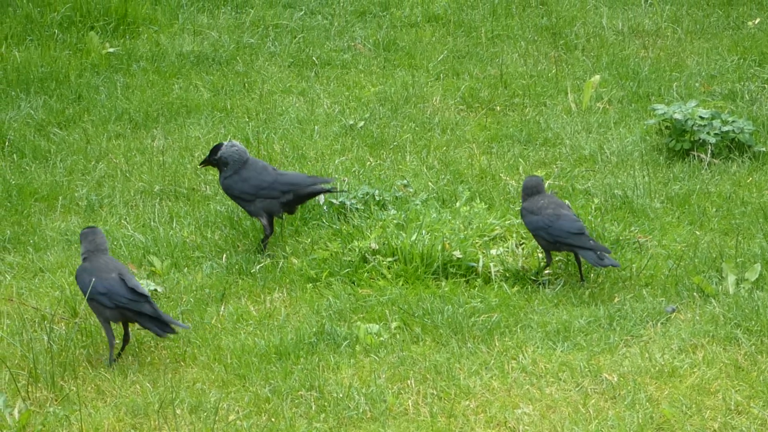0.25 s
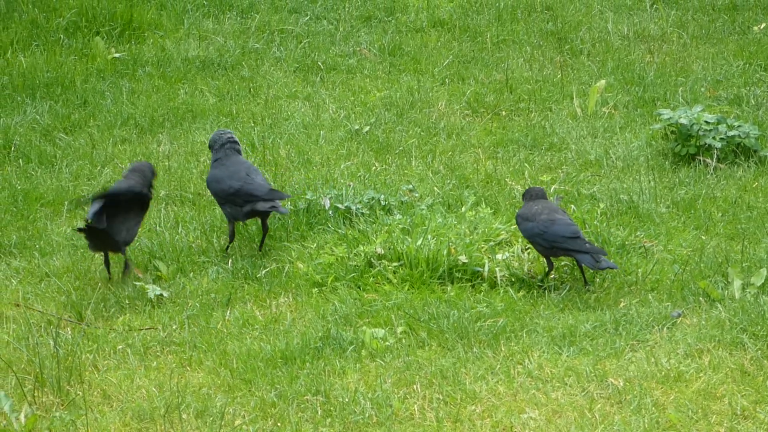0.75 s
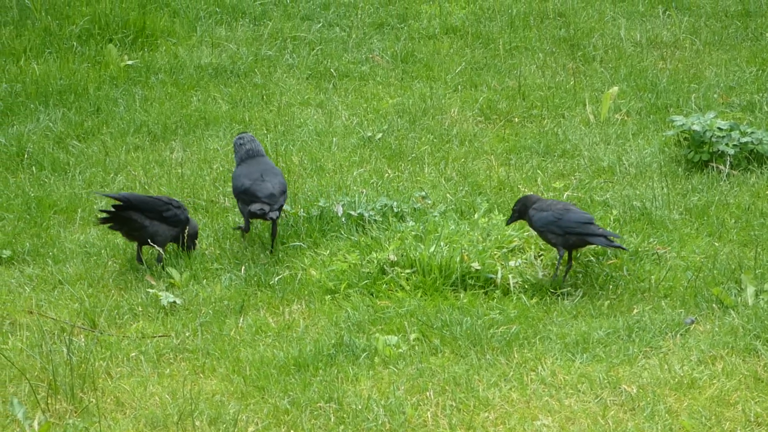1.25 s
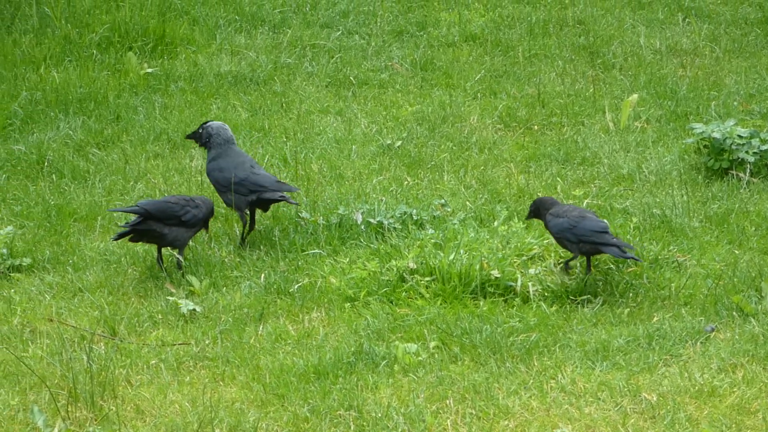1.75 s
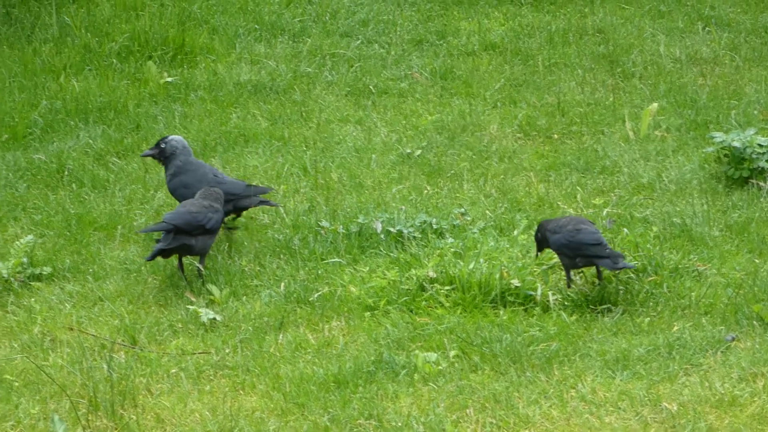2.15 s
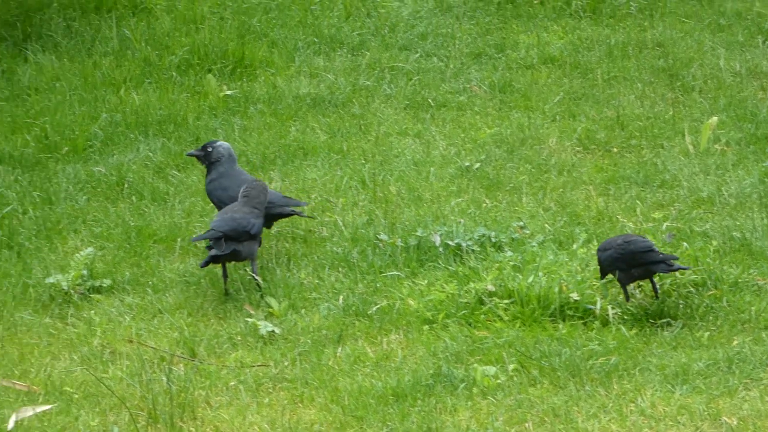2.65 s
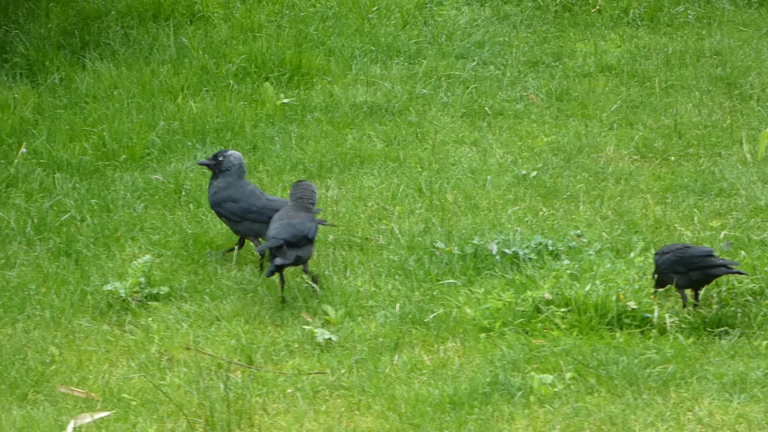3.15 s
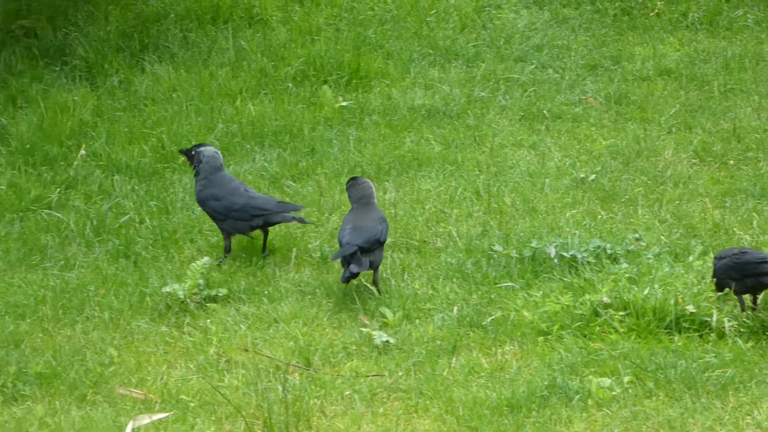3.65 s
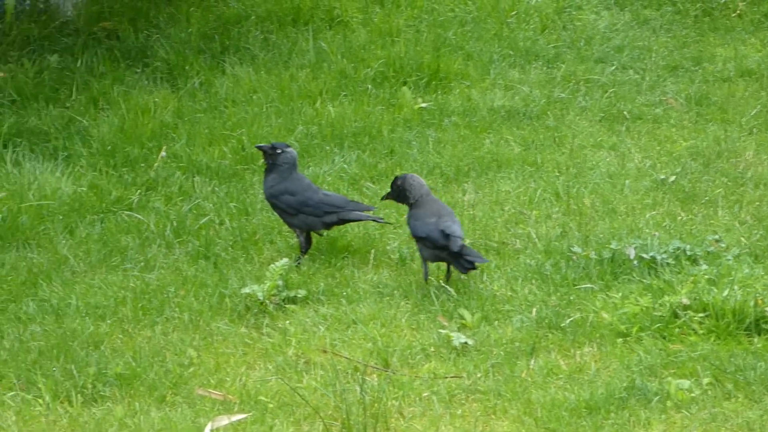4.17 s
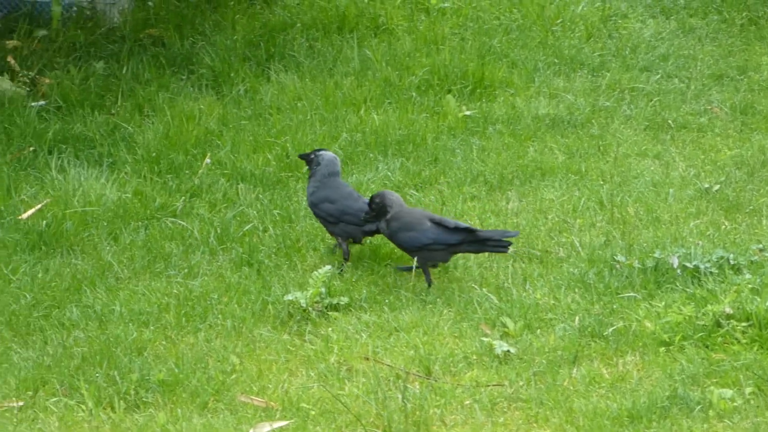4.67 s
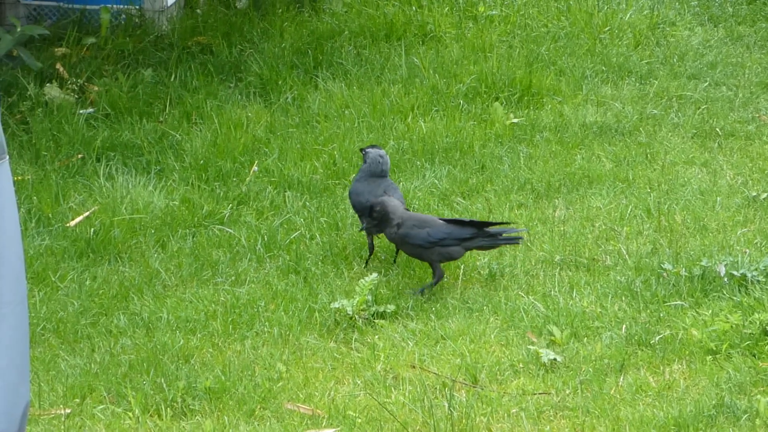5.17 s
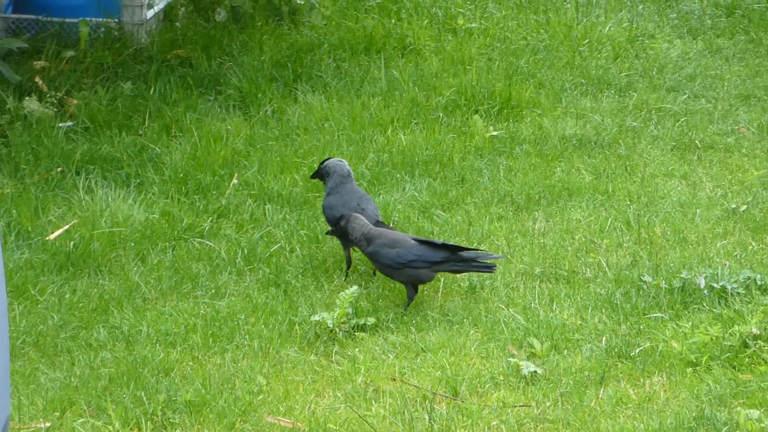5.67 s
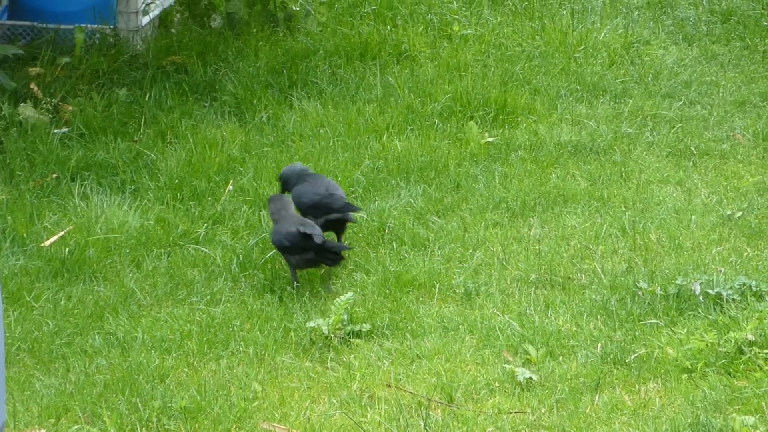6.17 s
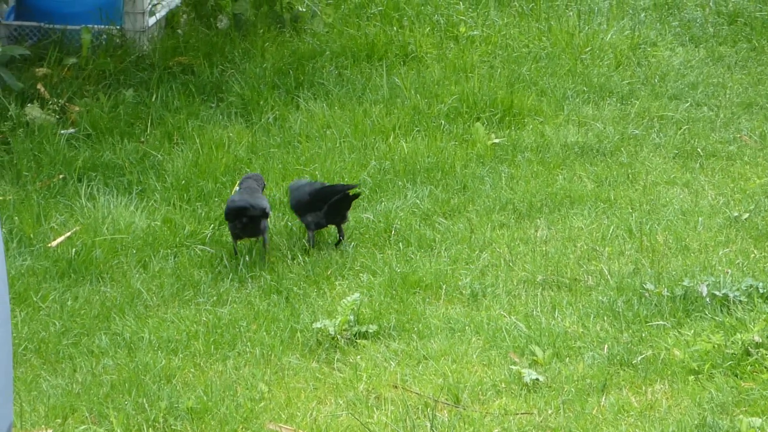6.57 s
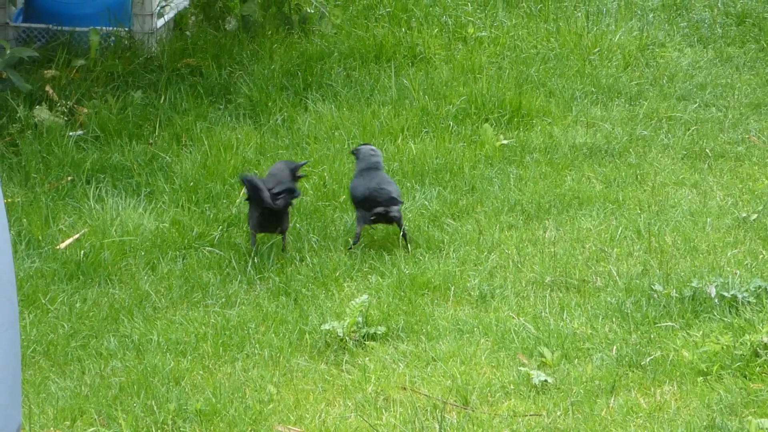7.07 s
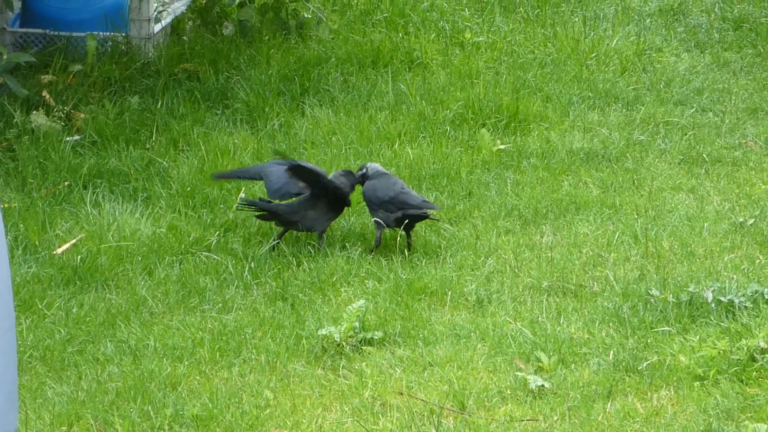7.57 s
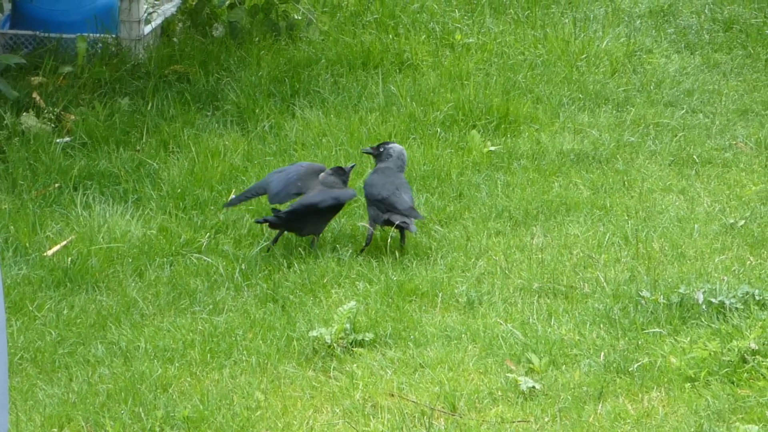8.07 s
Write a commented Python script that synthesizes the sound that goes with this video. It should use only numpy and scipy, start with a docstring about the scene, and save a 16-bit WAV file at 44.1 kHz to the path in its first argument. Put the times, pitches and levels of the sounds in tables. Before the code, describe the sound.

Jackdaws chatter rapidly with harsh chaks, squeaks and nasal caws in a garden, ending with two louder falling begging calls.

```python
"""Jackdaws on a lawn between echoing house walls, over a soft outdoor hush. First come a spit of hiss
from a bill and low mutters. From 0.6 s one bird runs four times through a phrase of whistles, chaks,
tsiks, squeaks, wheeps and rasps, with nasal caws in between; a dull knock falls at 5.5 s. Just after 7 s
come two loud, falling begging calls, then a last mutter. Each call is a vibrating membrane in the
bird's voice box, mixed with breath and shaped by the throat and bill."""
import sys
import numpy as np
from scipy import signal
from scipy.fft import rfft, irfft
from scipy.io import wavfile

SR = 44100
rng = np.random.default_rng(int(sys.argv[2]) if len(sys.argv) > 2 else 0)


def generate_wav(signal):
    """Clip the signal to [-1, 1] and save it as 16-bit WAV at the path in sys.argv[1]."""
    frames = np.transpose(np.atleast_2d(signal))
    scaled = np.clip(frames, -1, 1) * 32767
    pcm = np.round(scaled).astype(np.int16)
    wavfile.write(sys.argv[1], SR, pcm)


N = 367353
CUTOFF_HZ = 15750

# Begging calls: t/s, length/s, level/dB, attack/s, release/s, droop/(dB/s), f/Hz, sag/(Hz/s),
# lowest f/Hz, starting roughness/0-1, crack t/s, crack drop/Hz, tumble t/s, tumble drop/Hz
BEG_CALLS = [(7.165, 0.25, -23, 0.037, .075, 59, 1428, 2757, 526.4, 0.03, .037, 204.7, .082, 225.4),
             (7.558, 0.18, -28, 0.049, 0.072, 20, 1432, 3400, 444, 0.76, 0.032, 110.8, .072, 270.2)]
# Tone colour the throat gives them: f/Hz, level/dB
BEG_COLOUR = [(500, -37), (1050, -13), (1450, -7.5), (2050, 1), (2800, 0), (3400, -11), (4100, -21.5),
              (4700, -4), (5200, -12.5), (6200, -3), (7400, -22), (8600, -13), (11000, -24), (15000, -40)]


def begging():
    """Two loud calls that fall by more than an octave while the bill opens."""
    out = np.zeros(N)
    for s, *call in BEG_CALLS:
        shape, gape = beg_shape(*call)
        add(out, s, syrinx(shape, BEG_COLOUR, jitter=.06, breathiness=.6, gape=gape, fray=.17))
    return out


def beg_shape(length_s, top_db, attack_s, release_s, droop_db_per_s, start_hz, sag_hz_per_s, lowest_hz,
              onset_rough, crack_s, crack_hz, tumble_s, tumble_hz):
    """The pitch sags, cracks suddenly, then tumbles softly; the voice falters at both drops."""
    t = np.arange(round(length_s * SR)) / SR
    tumble_width_s, recover_s = .0112, .0072
    cracked, tumbled = step(t, crack_s, width_s=.00063), step(t, tumble_s, tumble_width_s)
    pitch = np.maximum(start_hz - sag_hz_per_s * t - crack_hz * cracked - tumble_hz * tumbled, lowest_hz)
    pitch *= 1 + .013 * cracked * flutter(rate_hz=120, size=len(t))   # a quaver after the crack
    level_db = top_db + envelope(t, attack_s, release_s, fade_db=11.5, onset_db=31.5)
    level_db -= droop_db_per_s * t
    level_db -= 19 * cracked * np.exp(-np.abs(t - crack_s) / recover_s)
    level_db -= 5 * bump(t, tumble_s, tumble_width_s)
    late_rough = np.interp(pitch, [lowest_hz, start_hz], [.4, .18])   # lower is rougher
    roughness = (1 - cracked) * onset_rough + cracked * late_rough
    focus = (1 - cracked) * 1.55 + cracked * np.interp(t, [crack_s, length_s], [1.39, .75])
    early = t < tumble_s + tumble_width_s   # the open bill boosts harmonic 2, then harmonic 4
    gape_hz, boost_db = np.where(early, 2, 4) * pitch, np.where(early, 4.5, 7.5)
    return np.column_stack([t, pitch, level_db, roughness, focus]), np.column_stack([t, gape_hz, boost_db])


# Chaks sung: t/s, level/dB, length factor, pitch factor
CHAK_NOTES = [(.738, -39, 1.12, 0.99), (1.336, -38.5, 1.2, 1.013), (2.232, -37.5, 1.13, 1.02),
              (2.846, -37, 1.07, 1.01), (4.069, -37.5, 1.07, 1.003), (4.679, -36.5, 1.01, 1.005),
              (6.080, -37.5, 1.11, 0.99), (6.692, -37, 1.1, 1.027)]
# Throat colour: f/Hz, level/dB
CHAK_COLOUR = [(500, -10.5), (750, -21.5), (1400, -6.5), (1900, -11), (2800, -2.5), (3400, -0.5),
               (3880, 2.5), (4450, -8.5), (6000, -14), (7500, -24.5), (10000, -27.5), (15000, -68)]
# Moving boost from the open bill: t/s, f/Hz, level/dB
CHAK_BILL = [(0, 3900, 8.1), (.035, 3860, 1.3), (.05, 1570, 0.93), (.08, 750, 7), (.11, 720, 18.7)]


def chaks():
    """Hard, hoarse calls that break to a lower pitch."""
    shape = syllable(length_s=.11, start_hz=1288.4, end_hz=702.5, sag_hz_per_s=898, break_s=.033,
                     slide_s=.017, attack_s=.0098, release_s=.1, fade_db=12.5, top_db=.5, dip_db=2.5,
                     rough=(.46, .85, .37), focus=(2.04, 1.03))
    return sing(CHAK_NOTES, shape, CHAK_COLOUR, jitter=.065, breathiness=.62, gape=CHAK_BILL)


# Tsiks sung: t/s, level/dB, length factor, pitch factor
TSIK_NOTES = [(1.061, -43, 1.16, 0.94), (2.561, -41.5, 1.07, 0.95), (4.393, -41.5, 1.05, 1.001),
              (6.413, -41.5, 1.12, 0.94)]
# Throat colour: f/Hz, level/dB
TSIK_COLOUR = [(600, -22), (1300, 8), (2200, -3.5), (3000, -1), (3700, 15.5), (4700, -4.5), (6000, -1),
               (6700, 11.5), (7450, -15.5), (8050, -37), (9800, -2), (15000, -45)]
# Boost from the open bill: t/s, f/Hz, level/dB
TSIK_BILL = [(0, 6740, 3.7), (.01, 6900, 9.4), (.02, 3750, 8), (.032, 3700, 6), (.05, 1210, 2.8)]


def tsiks():
    """Sharp, breathy calls that dive two octaves."""
    shape = syllable(length_s=.09, start_hz=3435, end_hz=793, break_s=.015, slide_s=.017, attack_s=.0014,
                     release_s=.094, fade_db=14.5, top_db=3, rough=(.75, .923, .85), focus=(1.85, .99))
    return sing(TSIK_NOTES, shape, TSIK_COLOUR, jitter=.075, breathiness=.7, gape=TSIK_BILL)


# Rasps sung: t/s, level/dB, length factor, pitch factor
RASP_NOTES = [(1.663, -38, 1.016, 0.97), (3.168, -38.5, 1.015, 0.99), (5.000, -38.5, 1.01, 1.001),
              (7.029, -38, 0.97, 0.94)]
# Throat colour: f/Hz, level/dB
RASP_COLOUR = [(600, -12), (1250, -4.5), (1700, -3.5), (2150, -2.5), (3500, 4.5), (4300, 0.5), (5500, -2),
               (6400, -15), (7400, -22), (10000, -10.5), (15000, -111)]
# Boost from the open bill: t/s, f/Hz, level/dB
RASP_BILL = [(0, 6560, 14), (.02, 6350, 6.5), (.036, 3900, 0.92), (.08, 3500, 4), (.16, 3450, 3.8)]


def rasps():
    """A longer, falling call with a shaky pitch ends each phrase."""
    shape = syllable(length_s=.18, start_hz=2158, end_hz=563, sag_hz_per_s=4500, break_s=.029,
                     slide_s=.031, attack_s=.026, release_s=.087, fade_db=8.5, top_db=-1, dip_db=7.5,
                     rough=(.33, .81, .363), focus=(.87, 1.265))
    return sing(RASP_NOTES, shape, RASP_COLOUR, jitter=.1074, breathiness=.21, gape=RASP_BILL)


# Whistles sung: t/s, level/dB, length factor, pitch factor
WHISTLE_NOTES = [(.662, -48, 1.2, 1.01), (2.137, -39.5, 1.17, 0.99), (3.979, -43.5, 1.07, 1.001),
                 (5.988, -45.5, 1.2, 0.99)]
# Squeaks sung: t/s, level/dB, length factor, pitch factor
SQUEAK_NOTES = [(.677, -45, 0.53, .98), (1.183, -36.5, 1.3, 1.02), (2.686, -34, 0.89, 0.99),
                (4.519, -34, 1.07, 0.98), (6.542, -35.5, 1.18, 1.003)]
# Wheeps sung: t/s, level/dB, length factor, pitch factor
WHEEP_NOTES = [(1.250, -36, 0.86, 0.98), (2.754, -38, 1.47, 0.97), (4.593, -39.5, 1.35, 1.018),
               (6.609, -36, 0.93, 0.99)]
# Chirps sung: t/s, level/dB, length factor, pitch factor
CHIRP_NOTES = [(.594, -53.5, 1.03, 0.93), (3.910, -50.5, 1.33, 0.98), (5.928, -49, 1.02, 1.02)]
# Throat colour of all four: f/Hz, level/dB
CLEAR_COLOUR = [(1500, -27), (2500, -6), (3000, 4), (3900, -3), (4400, -19), (5200, -32), (7600, -36),
                (12000, -55)]


def whistling():
    """The clear notes: a chirp, a throbbing whistle, and a trilled squeak that steps up to a wheep."""
    chirp = syllable(length_s=.06, start_hz=2810, end_hz=2910, break_s=.04, slide_s=.008, attack_s=.013,
                     release_s=.005, fade_db=3, top_db=-1.5, dip_db=10, rough=(.6, .65, .5))
    whistle = syllable(length_s=.057, start_hz=3870, end_hz=3770, break_s=0, slide_s=.014,
                       attack_s=.053, release_s=.018, fade_db=18, top_db=2, rough=(.05, .059, .06))
    squeak = syllable(length_s=.051, start_hz=3810, end_hz=3860, break_s=.014, slide_s=.017,
                      attack_s=.0031, release_s=.03, fade_db=9, top_db=-.5, rough=(.54, .5, .68))
    wheep = syllable(length_s=.089, start_hz=4104, end_hz=4190, break_s=.028, slide_s=.026,
                     attack_s=.0089, release_s=.081, fade_db=20, rough=(.46, .31, .3))
    out = sing(WHISTLE_NOTES, whistle, CLEAR_COLOUR, jitter=.11, breathiness=1.6, beat_hz=36.7, twin=.58)
    out += sing(SQUEAK_NOTES, squeak, CLEAR_COLOUR, jitter=.0725, breathiness=.22,
                beat_hz=102.3, twin=.69)
    out += sing(WHEEP_NOTES, wheep, CLEAR_COLOUR, jitter=.06, breathiness=.24, beat_hz=92.6, twin=.39)
    return out + sing(CHIRP_NOTES, chirp, CLEAR_COLOUR, jitter=.071, breathiness=.67)


# Pips sung: t/s, level/dB, length factor, pitch factor
PIP_NOTES = [(1.241, -46.5, 1.34, 0.95), (1.668, -59, .8, .985), (2.744, -42, 0.57, 0.97),
             (3.168, -46.5, 1.5, .98), (4.578, -45.5, 1.18, 0.96), (6.594, -44.5, 1.37, 0.95),
             (7.035, -42, 1.06, 0.97)]
# Throat colour: f/Hz, level/dB
PIP_COLOUR = [(4500, -23), (6200, -6), (6700, -23), (8000, -25), (14000, -38)]


def pips():
    """Very high notes that fade fast."""
    shape = syllable(length_s=.069, start_hz=6700, end_hz=6560, break_s=.0117, slide_s=.024,
                     attack_s=.0071, release_s=.068, fade_db=27.5, top_db=2.5, rough=(.3, .33, .23))
    return sing(PIP_NOTES, shape, PIP_COLOUR, jitter=.065, breathiness=.67)


# Caws sung: t/s, level/dB, length factor, pitch factor
CAW_NOTES = [(.935, -47, 0.93, 0.98), (1.540, -45.5, 0.98, 0.99), (1.922, -42.5, 1.06, 0.96),
             (2.435, -46, 0.98, 1.0), (3.048, -45, 0.79, 0.99), (3.665, -44, 1.45, .92),
             (4.272, -46, 0.88, 0.99), (4.885, -46, .95, 1.0), (6.285, -46, 1, 0.98),
             (6.895, -45, .88, 1.0)]
# Throat colour: f/Hz, level/dB
CAW_COLOUR = [(590, -15.5), (1170, -5.5), (1750, -13), (2350, -7), (2950, 2.5), (3550, -3), (4160, 0.5),
              (4800, -17), (7500, -29), (9500, -18), (15000, -60)]
# Boost from the open bill: t/s, f/Hz, level/dB
CAW_BILL = [(0, 1160, 7.4), (.035, 4350, 1.3), (.065, 2950, 8.4), (.11, 2900, 3)]


def caws():
    """Nasal calls whose pitch rises a little and eases back."""
    shape = syllable(length_s=.1, start_hz=568, end_hz=566, sag_hz_per_s=-650, break_s=.045, slide_s=.08,
                     attack_s=.05, release_s=.045, fade_db=14, rough=(.16, .12, .3), focus=(.8, 1.05))
    return sing(CAW_NOTES, shape, CAW_COLOUR, jitter=.083, breathiness=1.94, gape=CAW_BILL)


# Mutters sung: t/s, level/dB, length factor, pitch factor
MUTTER_NOTES = [(.230, -55.5, 0.66, 1.2), (.422, -57, 0.65, 1.1), (2.065, -49, 0.41, 1.001),
                (3.488, -46, 0.81, 1.07), (5.352, -49.5, 0.87, 1.001), (5.797, -50.5, 0.7, 1.17),
                (8.122, -50.5, 0.79, 0.95)]
# Throat colour: f/Hz, level/dB
MUTTER_COLOUR = [(450, -23), (1080, -27), (1650, 5), (2150, -1), (2700, 3.5), (3250, -4), (3800, -4),
                 (4400, -5), (6000, -18.5), (14000, -44)]


def mutters():
    """Soft, low notes between the phrases."""
    shape = syllable(length_s=.065, start_hz=417, end_hz=392, break_s=.04, slide_s=.02, attack_s=.018,
                     release_s=.04, fade_db=3, top_db=-2.5, rough=(.28, .3, .4), focus=(.95, 1.2))
    return sing(MUTTER_NOTES, shape, MUTTER_COLOUR, jitter=.085, breathiness=.68)


def syllable(length_s, start_hz, end_hz, break_s, slide_s, attack_s, release_s, fade_db, rough,
             sag_hz_per_s=0, top_db=0, dip_db=0, focus=(1, 1)):
    """A note's shape: the pitch holds or drifts until the voice breaks, then slides toward a new one."""
    t = np.linspace(0, length_s, round(length_s * SR) // 16)
    held_hz = start_hz - sag_hz_per_s * np.minimum(t, break_s)
    pitch = end_hz + (held_hz - end_hz) * np.exp(-np.maximum(t - break_s, 0) / slide_s)
    level_db = top_db + envelope(t, attack_s, release_s, fade_db, onset_db=8)
    level_db -= dip_db * bump(t, break_s, width_s=.0097)
    broken = step(t, break_s, width_s=.0062)
    # rough, 0-1: before the break, just after, at the end
    roughness = rough[0] + broken * (np.interp(t, [break_s, length_s], rough[1:]) - rough[0])
    # focus: before and after the break; 1 is normal, more means a closing bill
    bill_focus = focus[0] + broken * (focus[1] - focus[0])
    return np.column_stack([t, pitch, level_db, roughness, bill_focus])


def sing(notes, shape, throat, jitter, breathiness, gape=None, beat_hz=0, twin=0):
    """Repeat one note shape; a twin membrane, tuned slightly higher, may throb against the first."""
    out = np.zeros(N)
    for s, level_db, stretch, transpose in notes:
        varied = shape * [stretch, transpose, 1, 1, 1] + [0, 0, level_db, 0, 0]
        add(out, s, syrinx(varied, throat, jitter, breathiness, gape))
        if twin:
            add(out, s, -twin * syrinx(varied + [0, beat_hz, 0, 0, 0], throat, jitter, breathiness))
    return out / np.sqrt(1 + twin ** 2)


def syrinx(shape, throat, jitter, breathiness, gape=None, fray=0,
           gape_width_hz=380, lowest_hz=560, shimmer=.43, flutter_hz=650, edge_s=.0015):
    """The voice box: a membrane buzzes through the throat; roughness shakes it and lets air hiss by."""
    t = np.arange(shape[0][0], shape[-1][0], 1 / SR)
    pitch, level_db, rough, focus = along(shape, t)
    rough, focus = np.clip(rough, 0, 1), np.clip(focus, 0, 3)
    shaky_pitch = pitch * (1 + jitter * rough * flutter(flutter_hz, len(t)))
    phase = 2 * np.pi * np.cumsum(shaky_pitch) / SR
    orders = np.arange(1, CUTOFF_HZ // pitch.min() + 1)[:, None]   # harmonics: multiples of the pitch
    gains = response(throat, orders * pitch) ** focus   # a closing bill favours the strongest peak
    if gape is not None:
        gape_hz, boost_db = along(gape, t)
        gains = gains * from_db(boost_db / (1 + ((orders * pitch - gape_hz) / gape_width_hz) ** 2))
    lags = rng.uniform(0, 2 * np.pi, orders.shape) * (orders > 1)   # the ringing throat smears pulses
    lags = lags + fray * np.clip(orders - 3, 0, 6) * flutter(flutter_hz, len(t))   # the top turns noisy
    tone = (gains * np.sin(orders * phase + lags)).sum(0) / np.sqrt((gains ** 2).sum(0) / 2 + 1e-20)
    tone *= 1 + shimmer * rough * flutter(flutter_hz, len(t))
    closed = np.clip(focus - 1, 0, 1)
    hiss = np.sqrt(1 - closed) * noise(throat, len(t))
    hiss += np.sqrt(closed) * noise(np.array(throat) * [1, 2], len(t))
    hiss = rms_one(hiss * (2 + np.cos(phase)))   # air passes as the membrane opens
    air = np.clip(breathiness * rough, 0, 1)
    edges = np.clip(np.minimum(t - t[0], t[-1] - t) / edge_s, 0, 1)
    voice = from_db(level_db) * edges * (np.sqrt(1 - air ** 2) * tone + air * hiss)
    return filtered(voice, 4, lowest_hz, "high")   # a small bill gives out no bass


# Spits from the bill: t/s, level/dB, length/s
BILL_SNAPS = [(0.117, -47, 0.036), (1.505, -38.5, 0.036), (3.586, -40, 0.033)]
# Colour of their hiss: f/Hz, level/dB
SNAP_HISS = [(530, -29), (900, -13), (1400, -16.5), (2150, 0.5), (2450, -18), (2760, -1), (4490, -8),
             (6050, -1), (7770, -6), (11500, -5.5), (15500, -14)]


def snaps(rise_s=.0051):
    """Short bursts of hiss from the bill."""
    out, t = np.zeros(N), np.arange(SR // 5) / SR
    for s, level_db, length in BILL_SNAPS:
        burst = (1 - np.exp(-t / rise_s)) * np.exp(-(t / length) ** 2)
        add(out, s, from_db(level_db) * noise(SNAP_HISS, len(t)) * burst)
    return out


# Ringing tones of the knock: f/Hz, level/dB, time to fade 60 dB/s
KNOCK_TONES = [(284, -9, 0.077), (378, 6.5, 0.046), (438, -16, .06), (512, -8, 0.087), (643, -12, 0.12)]
# Colour of its tick: f/Hz, level/dB
TICK_COLOUR = [(700, 6), (2000, 1), (6000, -18), (13000, 0), (15500, 4)]


def knock(at_s=5.516, tick_s=.0056):
    """A dull knock nearby: a small tick of contact and a few low, ringing tones."""
    out, t = np.zeros(N), np.arange(SR // 2) / SR
    body = sum((-1) ** k * from_db(db - 60 * t / t60) * np.sin(2 * np.pi * hz * t)
               for k, (hz, db, t60) in enumerate(KNOCK_TONES))
    tick = noise(TICK_COLOUR, len(t)) * np.exp(-t / tick_s)
    add(out, at_s, from_db(-52.5) * body + from_db(-50) * tick)
    return out


# Echoes off the walls: t/s, level/dB, left minus right/dB
WALL_ECHOES = [(.0065, -11, 13.5), (0.0174, -9, -7.5), (0.03, -4, 1), (.052, -19.5, -1), (.074, -16.5, 2)]
# Wash of later echoes: f/Hz, level/dB, time to fade 60 dB/s, stereo width/dB
ECHO_TAIL = [(417, 8.5, 0.16, 0), (1240, -3.5, 0.66, -0.5), (2520, -1.5, 0.42, -6), (3900, -4, 0.63, -12.5),
             (7200, -4.5, 0.33, -7), (14100, -9, 0.28, 4.5)]


def garden(x, wet_db, build_s=.0089):
    """The direct sound, a few wall echoes and a short, blurred tail."""
    t, paths = np.arange(SR) / SR, np.zeros((2, SR))
    edges = np.geomspace(150, CUTOFF_HZ, 13)
    build_up = 1 - np.exp(-(t / build_s) ** 2)
    for low, high in zip(edges, edges[1:]):
        hz = np.sqrt(low * high)
        mid, side = filtered(rng.standard_normal((2, SR)), 2, [low, high], "band")
        decay = np.exp(-np.log(1000) * t / at_hz(ECHO_TAIL, hz, column=2)) * build_up
        spread = mid + from_db(at_hz(ECHO_TAIL, hz, column=3)) * side * [[1], [-1]]
        paths += from_db(at_hz(ECHO_TAIL, hz)) * spread * decay / np.linalg.norm(decay)
    for delay, level_db, pan_db in WALL_ECHOES:
        paths[:, round(delay * SR)] += from_db([level_db + pan_db / 2, level_db - pan_db / 2])
    return x + from_db(wet_db) * signal.fftconvolve(x[None], paths, axes=1)[:, :N]


# Hush shared by both ears: f/Hz, level/dB
SHARED_COLOUR = [(15, -55), (25, -34), (99, -14), (173, -8.5), (246, -5), (313, -1.5), (666, -5),
                 (804, -5.5), (945, -9), (1110, -13.5), (1200, -8), (1450, -10), (3630, -13), (5730, -14.5),
                 (15500, -25)]
# Hush opposite in the two ears: f/Hz, level/dB
OPPOSITE_COLOUR = [(15, -70), (25, -56), (129, -19), (160, -20), (188, -12.5), (221, -15), (260, -11.5),
                   (469, -11.5), (582, -13.5), (848, -16.5), (1200, -21.5), (1340, -21), (3930, -34),
                   (6050, -40), (15500, -47.5)]
# Loudness of the hush: t/s, shared level/dB, opposite level/dB
HUSH_LEVELS = [(0, -59.5, -53), (2, -57.5, -51), (4, -58.5, -51), (5.7, -60, -52), (8.33, -59, -51)]
# Colour of the far-off rumble: f/Hz, level/dB
RUMBLE_COLOUR = [(60, -39), (95, -1), (125, -29), (165, 6.5), (200, -7), (300, -46), (600, -52)]
# Its loudness: t/s, level/dB
RUMBLE_LEVELS = [(0, -72), (1, -75), (2, -76), (3.2, -76.5), (4.2, -97), (8.33, -97)]


def hush():
    """Wide, distant outdoor noise and a faint rumble that fades around 4 s."""
    t = np.arange(N) / SR
    shared_db, opposite_db = along(HUSH_LEVELS, t)
    rumble = from_db(along(RUMBLE_LEVELS, t)[0]) * noise(RUMBLE_COLOUR, N)
    shared = from_db(shared_db) * noise(SHARED_COLOUR, N)
    opposite = from_db(opposite_db) * noise(OPPOSITE_COLOUR, N) * [[1], [-1]]
    return shared + opposite + rumble


def envelope(t, attack_s, release_s, fade_db, onset_db):
    """Level in dB: a rounded rise, a hold and a steady fade."""
    rise = np.clip(1 - t / attack_s, 0, 1) ** 2
    fall = np.clip(1 - (t[-1] - t) / release_s, 0, 1)
    return -onset_db * rise - fade_db * fall


def step(t, at_s, width_s):
    """A smooth step from 0 to 1."""
    return .5 + .5 * np.tanh((t - at_s) / width_s)


def bump(t, at_s, width_s):
    """A brief hump of height 1."""
    return np.exp(-((t - at_s) / width_s) ** 2)


def from_db(db):
    """Decibels to gain."""
    return 10 ** (np.asarray(db) / 20)


def rms_one(x):
    """Scale to a power of 1."""
    return x / np.sqrt(np.mean(x ** 2) + 1e-20)


def along(rows, t):
    """Every column of a curve at the times t."""
    s, *columns = np.transpose(rows)
    return [np.interp(t, np.sort(s), c) for c in columns]


def at_hz(points, hz, column=1):
    """Read a table between its frequencies, with octaves evenly spaced."""
    points = np.array(points)
    return np.interp(np.log(hz + 1e-9), np.log(points[:, 0]), points[:, column])


def response(points, hz):
    """Gain of a tone colour: falls steeply below its first point, silent above hearing."""
    return from_db(at_hz(points, hz)) * np.minimum(hz / points[0][0], 1) ** 2 * (hz < .45 * SR)


def noise(points, size):
    """Noise of a given colour, power about 1."""
    padded = max(size, SR // 2)
    spectrum = rfft(rng.standard_normal(padded)) * response(points, np.fft.rfftfreq(padded, 1 / SR))
    return rms_one(irfft(spectrum, padded))[:size]


def filtered(x, order, hz, kind):
    """Keep the lows, the highs or a band."""
    return signal.sosfilt(signal.butter(order, hz, kind, fs=SR, output="sos"), x)


def flutter(rate_hz, size):
    """Random wavering up to a given rate."""
    return rms_one(filtered(rng.standard_normal(SR), 2, rate_hz, "low"))[SR // 4:][:size]


def add(track, s, sound):
    """Mix a sound into a track at time s."""
    start = max(round(s * SR), 0)
    track[start:start + len(sound)] += sound[:N - start]


def scene():
    """The birds in their garden; the begging comes from a little to the right."""
    hoarse = chaks() + tsiks() + rasps() + caws() + mutters()
    birds = garden(hoarse + snaps() + knock(), wet_db=.86)
    birds += garden(from_db(-.5) * (whistling() + pips()), wet_db=-3)
    birds += garden(begging(), wet_db=-3.5) * from_db([[.15], [1.44]])
    return birds + hush()


def record(dry):
    """The highest treble is cut steeply."""
    return signal.sosfilt(signal.ellip(12, .1, 70, CUTOFF_HZ, fs=SR, output="sos"), dry)


dry = scene()
out = record(dry)
generate_wav(out)
```